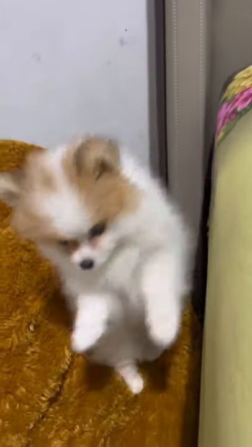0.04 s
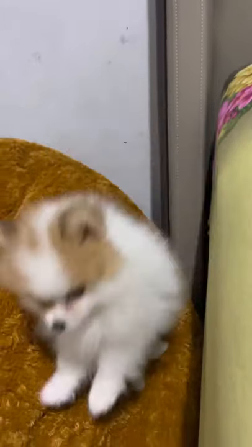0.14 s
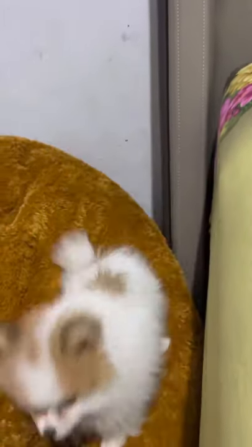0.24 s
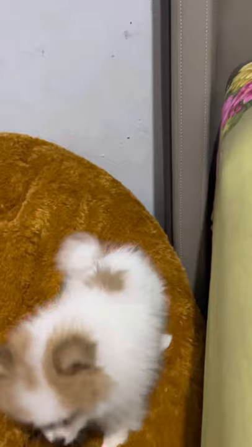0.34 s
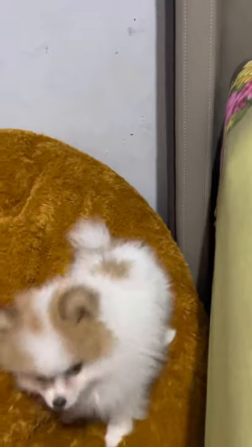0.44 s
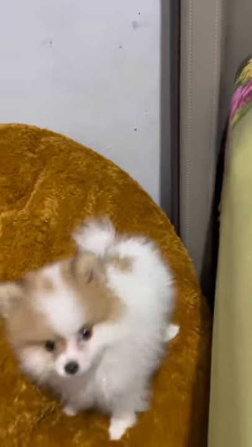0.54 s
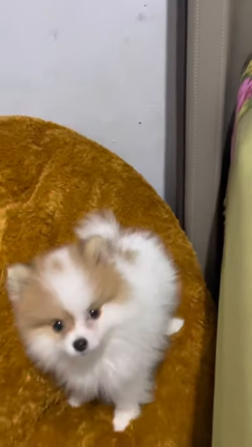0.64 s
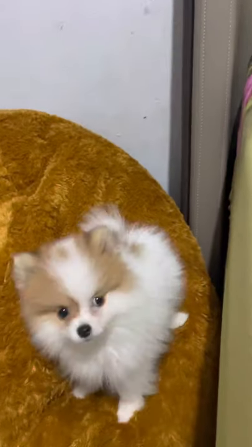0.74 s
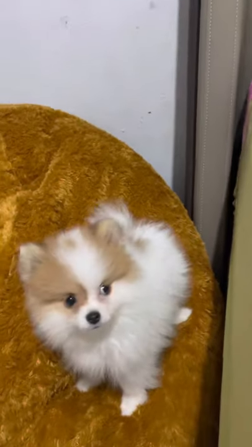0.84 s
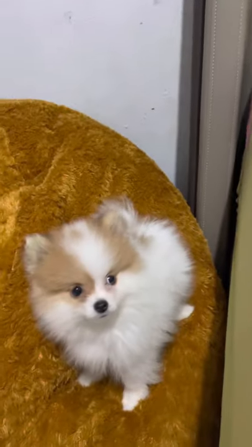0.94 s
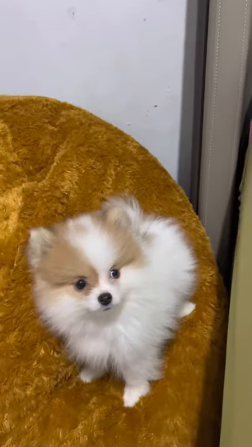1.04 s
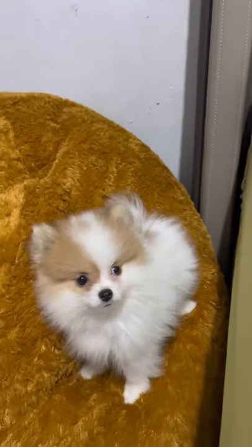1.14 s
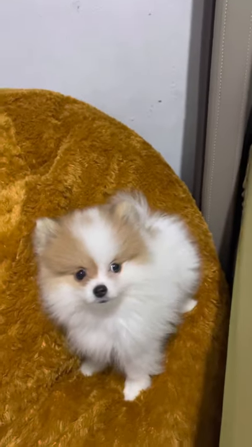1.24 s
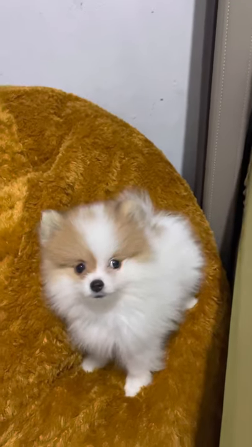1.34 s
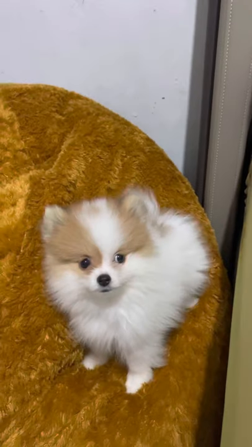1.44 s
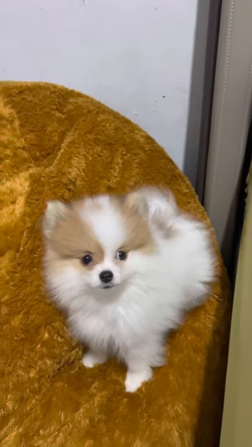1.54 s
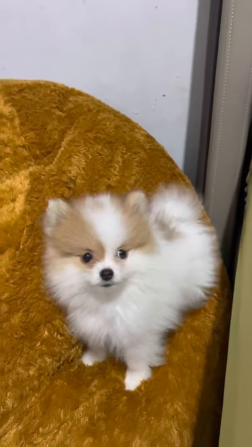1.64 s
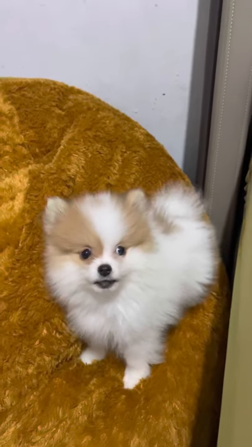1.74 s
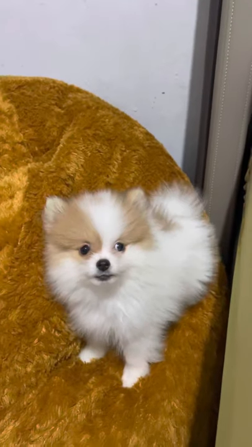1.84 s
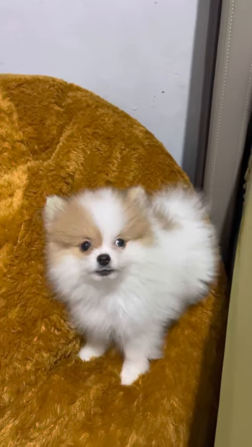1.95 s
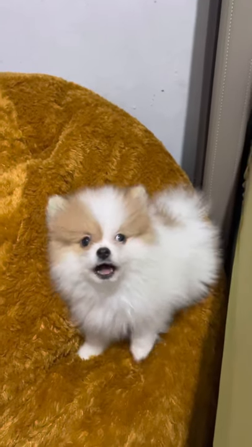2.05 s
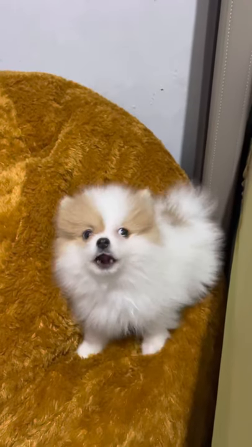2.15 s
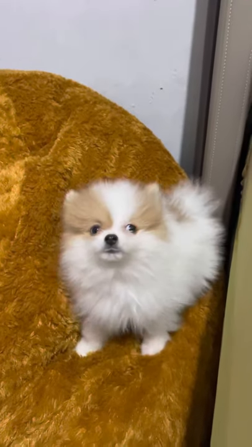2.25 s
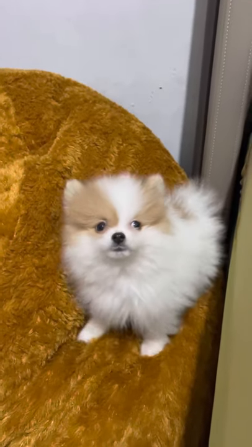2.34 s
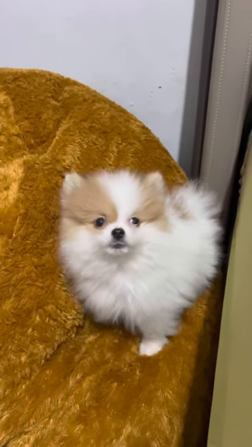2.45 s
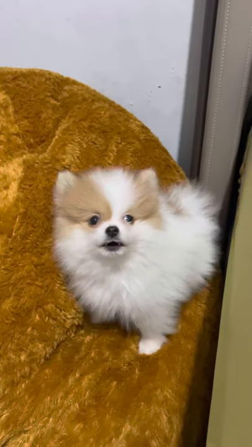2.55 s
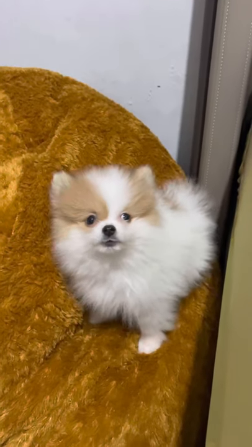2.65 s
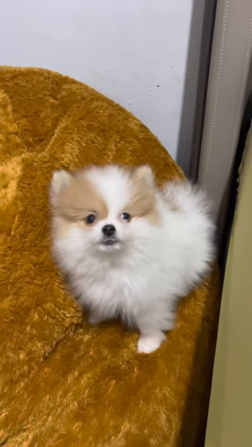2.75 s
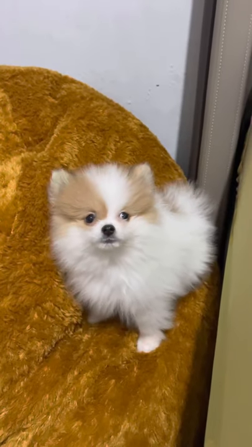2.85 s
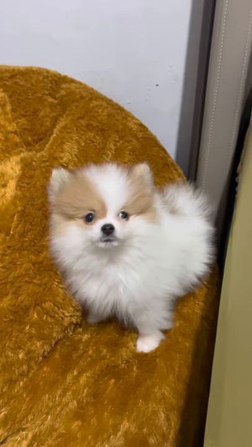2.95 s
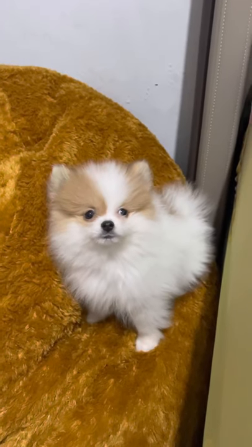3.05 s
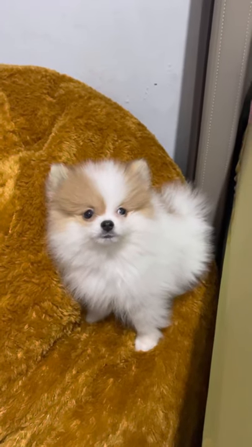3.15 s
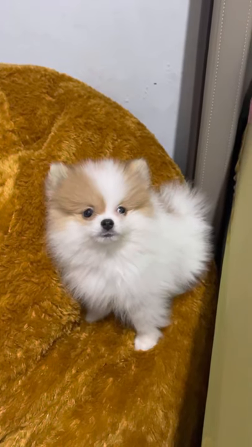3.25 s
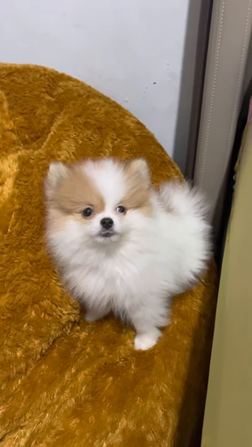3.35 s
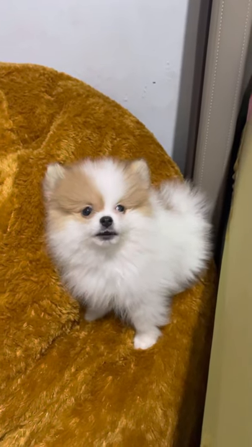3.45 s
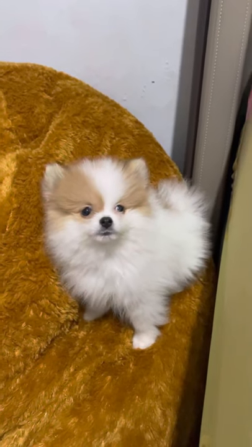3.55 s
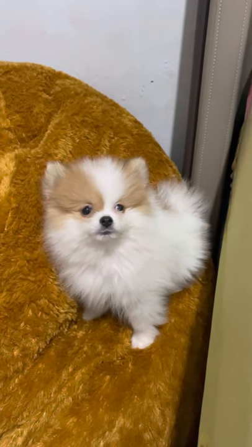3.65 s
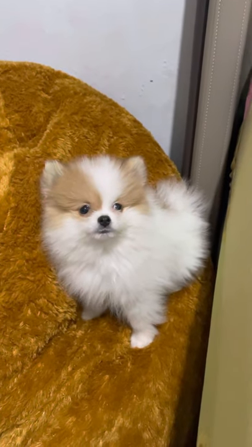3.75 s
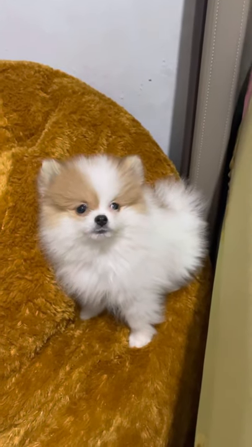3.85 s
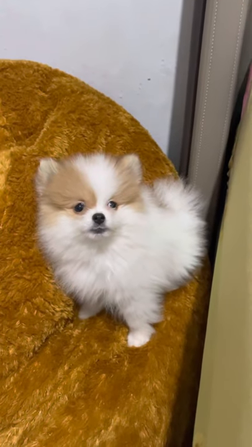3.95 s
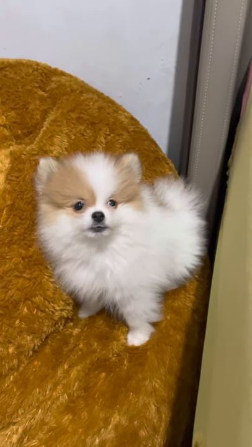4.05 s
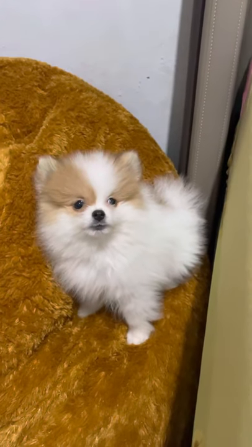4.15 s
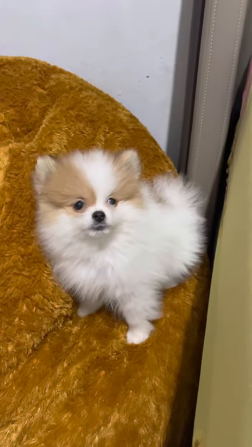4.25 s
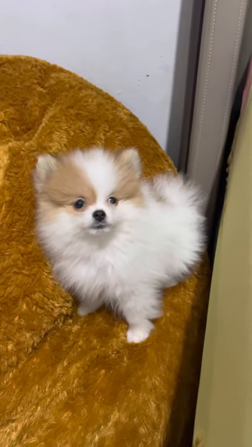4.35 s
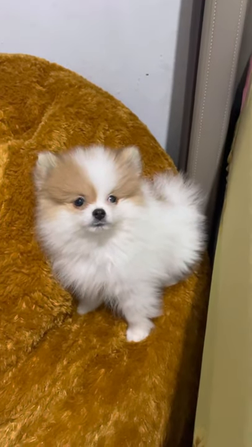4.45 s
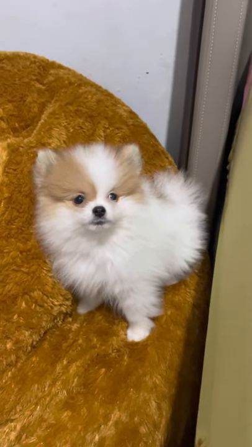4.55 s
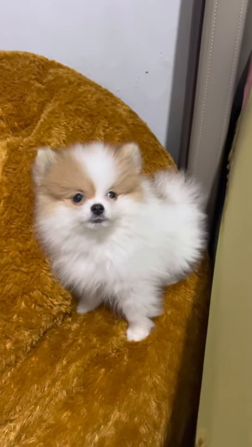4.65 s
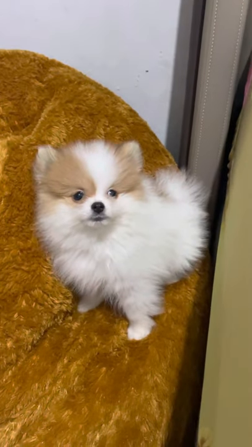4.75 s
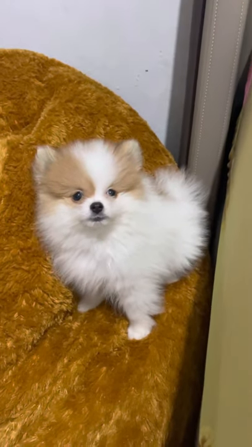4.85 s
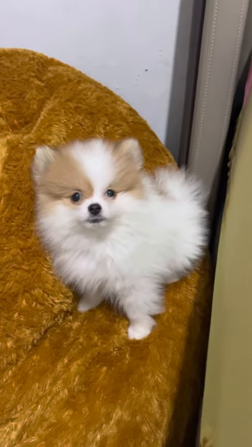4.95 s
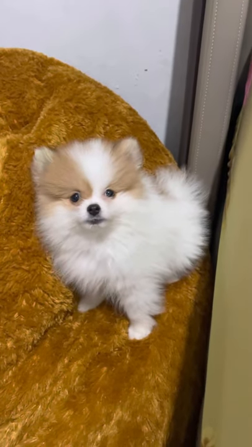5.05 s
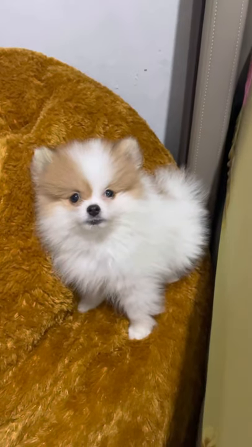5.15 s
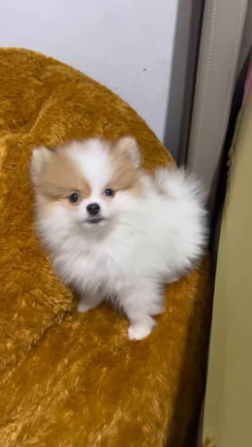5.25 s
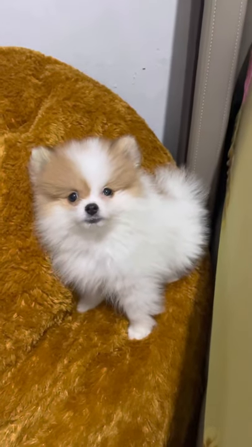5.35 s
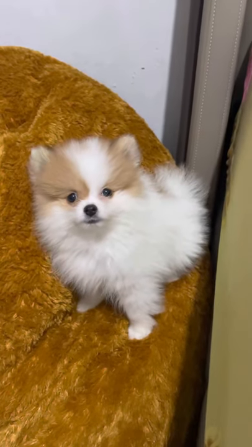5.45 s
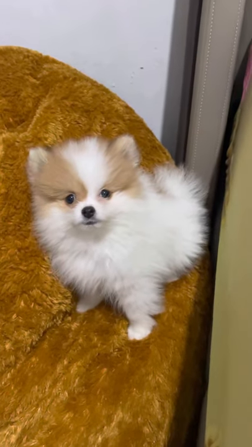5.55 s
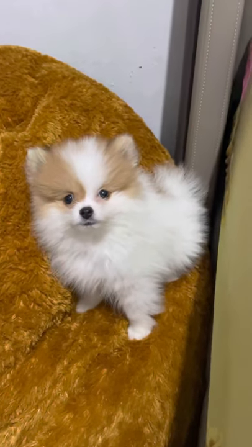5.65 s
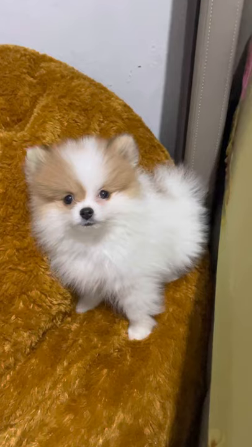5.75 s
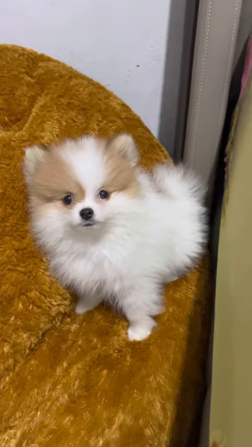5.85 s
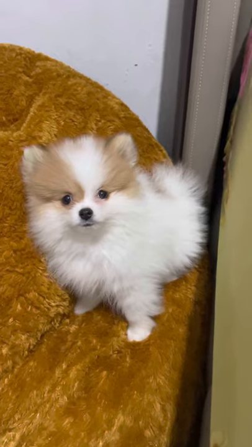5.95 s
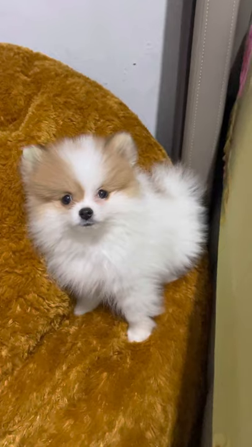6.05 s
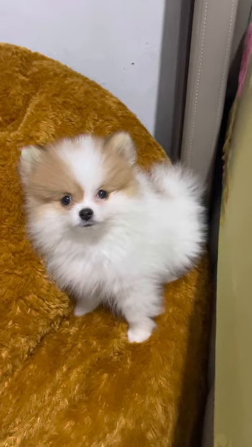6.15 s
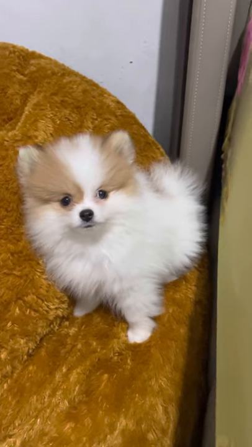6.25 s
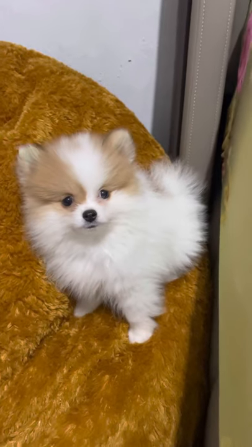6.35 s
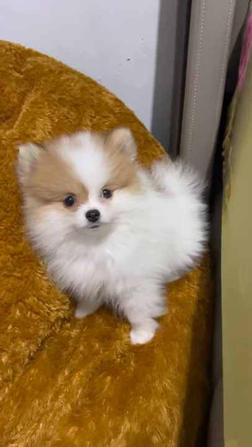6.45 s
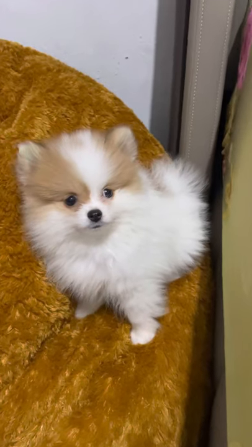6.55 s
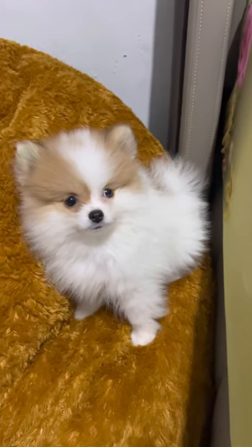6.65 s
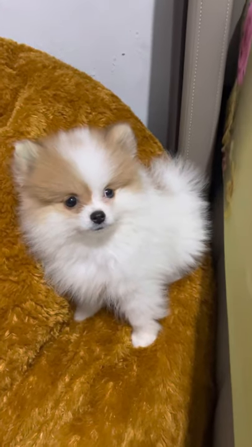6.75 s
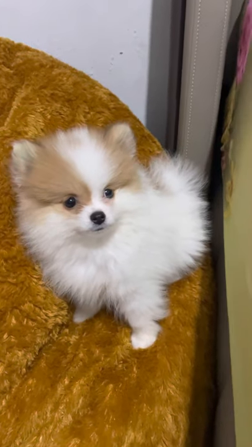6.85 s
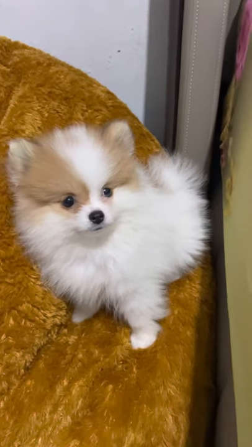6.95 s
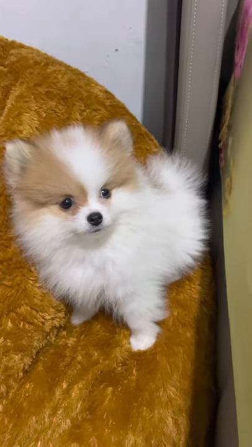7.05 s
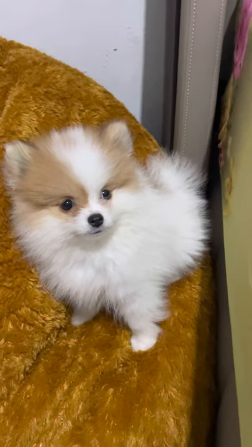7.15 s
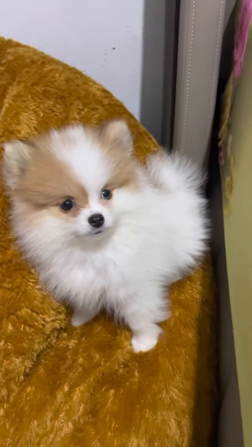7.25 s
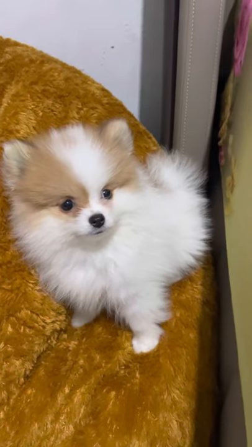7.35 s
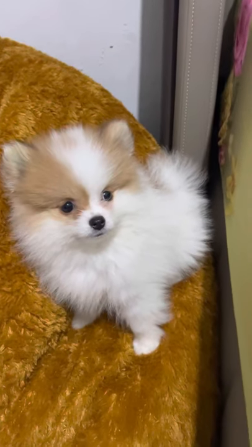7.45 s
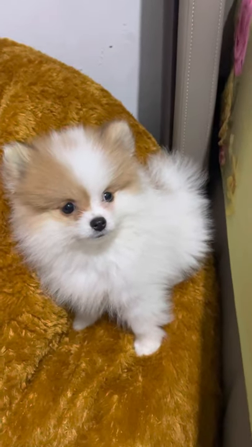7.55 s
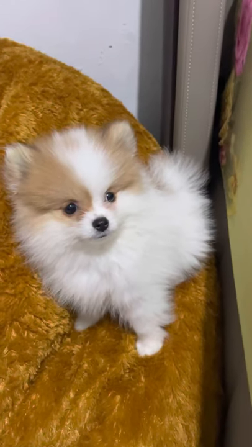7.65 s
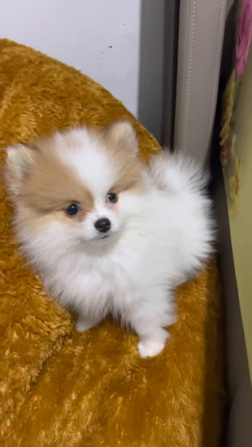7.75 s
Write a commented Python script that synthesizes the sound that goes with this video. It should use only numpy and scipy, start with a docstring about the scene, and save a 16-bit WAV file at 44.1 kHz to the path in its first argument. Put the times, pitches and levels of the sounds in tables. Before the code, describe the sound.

A puppy lands with a muffled rustle on deep fur fabric, waits, then cries out: a thin whistle-like squeak leaping into one strong yelp. Whimpers repeat roughly every half second to second, sliding downward with small raspy breaks, and shrink to tiny peeps. The stereo microphone is close, in a small room with a short light reverberation; a steady faint hum and soft air noise remain underneath.

```python
"""Indoors: a small puppy on a plush cushion drops on its paws, then yelps and whines, fading to soft cries.
Voice: summed partials that break between whistle, chest and growl registers, with noise and lip smacks.
Cushion: bursts of coloured noise. Room: a short tail of sparse random taps.
Machine: narrow-band drones and sines, stronger on the left. Behind: room tone and a faint treble swell.
A two-port microphone turns the treble phase and ducks the lows after loud sound."""
import sys
import numpy as np
from scipy import signal
from scipy.fft import rfft, irfft, next_fast_len
from scipy.io import wavfile
from scipy.ndimage import uniform_filter1d

SR = 44100
rng = np.random.default_rng(int(sys.argv[2]) if len(sys.argv) > 2 else 0)


def wrap_up_sound(samples):
    """Save the sound to the file named by the first command line argument, as 16-bit audio."""
    columns = np.atleast_2d(samples).T
    # keep every value between -1 and 1, then stretch to whole-number steps
    tamed = np.clip(columns, -1, 1)
    steps = np.round(tamed * 32767).astype(np.int16)
    wavfile.write(sys.argv[1], SR, steps)


N = 343655

# voice, one list per stretch between register breaks:
# time_s, pitch_hz, level_db, mouth_0_to_1, bright_db_per_octave, treble_lift_db
CRY_STRETCHES = [
    [(0.162, 1350, -51, 0.32, 2, 3), (0.174, 1110, -53, 0.32, -4, -7.0)],
    [(1.366, 1255, -60.5, 0.67, -4, -16), (1.374, 1127, -46, 0.7, -9, -15),
     (1.388, 1108, -65.5, 0.3, 0, -6)],
    [(1.723, 1829, -43.5, 0.86, -6, -16.5), (1.731, 1860, -26.5, 0.6, 4, 1.24),
     (1.738, 1899, -23.5, 0.6, 12.5, -12.5), (1.744, 1672, -28, 0.73, 7, 0.74),
     (1.75, 1508, -24.5, 0.66, 6, 6), (1.758, 1639, -24.5, 0.63, 8, -0.6),
     (1.768, 1805, -23.5, 0.56, 2.6, 9), (1.788, 1776, -27, 0.57, 5.3, 11),
     (1.8, 1682, -28.5, 0.61, 6.8, 9), (1.812, 1408, -27.5, 0.8, 2, -22.5), (1.817, 1308, -25, 0.8, -2, -4),
     (1.823, 1133, -32, 0.8, 2, -13.5)],
    [(2.013, 1179, -21.0, 1, -5.2, -4.0), (2.019, 1132, -16.5, 0.96, 4.5, -5.5),
     (2.027, 1162, -18, 1, -8, 3.26)],
    [(2.033, 661.8, -11.5, 0.51, 4, -2), (2.045, 677, -15, 1, -1.5, -16),
     (2.057, 707, -10.5, 0.89, 8, -22.5), (2.075, 738.5, -14, 0.87, 10.5, -22.5),
     (2.11, 762.2, -16.5, 0.84, 11.5, -27), (2.12, 755, -15.5, 0.59, 6, -9.5),
     (2.134, 809, -19, 0.6, 9.5, -17.5), (2.145, 798.3, -17, 0.55, 4.5, -8.0),
     (2.156, 768, -13.5, 0.56, 6.5, -13), (2.168, 752, -25, 0.7, -0.7, -13.4)],
    [(2.175, 1334, -16.5, 0.54, -3, 6), (2.191, 1280, -27, 0.53, -8, 1.2),
     (2.195, 1240, -37, 0.9, -4.5, -14)],
    [(2.224, 450, -42, 0.27, -9, -0.74), (2.24, 399, -38, 0.3, -1, -26),
     (2.254, 361.1, -39.5, 0.01, -8, -13), (2.28, 329.3, -38.5, 0.19, -2.5, -3),
     (2.3, 305.2, -40.5, 0, 2.7, -6), (2.33, 305.9, -39, 0.45, -11.5, 12)],
    [(2.534, 1086, -34.5, 0.57, -2.5, 1), (2.542, 1108, -33, 0.68, -1.2, -0.5),
     (2.554, 1096, -27, 0.65, 2.5, -4.5), (2.568, 1150, -28.0, 0.77, 7.5, -14.5),
     (2.582, 1162, -33, 0.69, 11, -26), (2.6, 1096, -35, 0.77, -1.2, -4),
     (2.61, 1083, -30.5, 0.58, 4, -18.5), (2.626, 1052, -30.7, 0.46, 3, -13),
     (2.666, 1110, -33.5, 0.53, -1, -9.5), (2.692, 1065, -33.5, 0.49, 2.5, -10),
     (2.775, 1031, -32, 0.41, 0, -10.5), (2.793, 945, -30.5, 0.42, -1, -16.5),
     (2.799, 842.7, -28.5, 0.39, -4, -10), (2.81, 848.4, -24.5, 0.27, -5.5, -2),
     (2.816, 800.6, -28.5, 0.27, -2.5, -11.5), (2.846, 824.5, -30.5, 0.15, 1.5, -14.5),
     (2.902, 797, -31, 0.19, -1.5, -10), (2.92, 744.5, -43.5, 0.1, -2.5, -15)],
    [(3.444, 1094, -29, 0.9, -2, -10), (3.447, 1082, -28, 0.93, -1.2, -21.5)],
    [(3.453, 547, -20.5, 0.62, -12, 16.5), (3.466, 558.3, -19, 0.5, -9.5, 25),
     (3.474, 614, -22.9, 1, -7.7, -6.5), (3.482, 670, -22, 0.54, -6.5, 13),
     (3.488, 721.3, -25, 0.19, 0.9, 0)],
    [(3.494, 1119, -21.5, 0.8, -2, 7), (3.503, 1109, -25, 0.57, -2.1, 1.5),
     (3.514, 1069, -24, 0.54, -1, -8), (3.53, 943, -23.5, 0.29, -4.5, 6),
     (3.562, 769.6, -27.5, 0.2, -6.5, 2.5), (3.578, 739, -35.5, 0.12, -6.5, 3.5)],
    [(3.584, 865.5, -40.5, 0.24, -2.5, 5), (3.596, 881, -32.5, 0.15, -9, 3.5),
     (3.608, 910.3, -43, 0.14, -4, -0.9)],
    [(3.62, 331.3, -46.5, 0.24, -3.5, 2.5), (3.654, 372.5, -38.5, 0.18, -4.5, 7.5),
     (3.674, 412.9, -37.5, 0.16, -3, -4.5), (3.698, 431, -41.5, 0.2, -5, -10.4)],
    [(3.704, 161, -39, 0.12, 0, -10), (3.728, 177, -40.5, 0.19, -2.5, -5.5),
     (3.742, 163.8, -38.5, 0.16, -1, -5), (3.78, 158.4, -43, 0.16, -1.5, -12.5),
     (3.812, 149, -45, 0.2, -3, -1.5), (3.838, 152.2, -50, 0.01, -9, 3.5)],
    [(4.118, 1118, -47.5, 0.6, -5.5, -19.4), (4.126, 1099, -36.5, 0.63, -1.5, -24.5),
     (4.138, 1020, -31, 0.46, -4, -15.5), (4.148, 1064, -32.5, 0.51, 1.6, -19),
     (4.165, 978.6, -28.0, 0.53, 1, -27), (4.181, 879, -26, 0.35, -1.5, -14),
     (4.211, 834.7, -26, 0.23, -0.6, -11.5), (4.261, 837.4, -26.5, 0.19, -4.5, 1.5),
     (4.288, 866.8, -26.5, 0.2, -2.5, -15)],
    [(4.294, 213, -31, 0.2, 0.2, -21), (4.302, 211.1, -30, 0.27, 0.6, -17.5),
     (4.362, 216.3, -36.5, 0.08, 4.5, -35), (4.374, 221, -37.5, 0.02, 3.5, -33.5),
     (4.39, 218, -39, 0.04, -1, -27.9), (4.406, 209.5, -41.6, 0.05, 0, -23.5),
     (4.42, 208, -40.5, 0.24, -3.3, -19.5), (4.472, 205, -38.5, 0.21, -6, -15.5)],
    [(4.484, 353, -40, 0, -5, -25.5), (4.494, 342, -47, 0, -14, -19)],
    [(4.764, 280.4, -47, 0.12, 1, -16), (4.782, 275, -36.5, 0.18, -6.5, -20.5)],
    [(4.788, 974.5, -40.5, 0.45, -8.1, -21.5), (4.8, 1068, -38.5, 0.53, -2.5, -25),
     (4.81, 968.3, -40, 0.35, -7, -20), (4.816, 902, -36, 0.35, -5.5, -23.5),
     (4.824, 870, -35, 0.16, -14, -18), (4.827, 883, -45.5, 0.2, -5.5, -2)],
    [(5.074, 1183, -45, 0.61, -4, -12), (5.082, 1099, -38.5, 0.6, -3.5, -19.5),
     (5.12, 1129, -37.5, 0.65, 1.8, -26), (5.146, 1049, -36.5, 0.51, -1, -18.5),
     (5.16, 971.4, -36.5, 0.44, -4, -17), (5.172, 893.5, -34.5, 0.25, -2, -10.5)],
    [(5.176, 803, -37.5, 0.12, -8, -13.5), (5.182, 768, -51, 0.12, 0, -6.5)],
    [(5.434, 1127, -51, 0.62, -5, -14.6), (5.444, 1118, -41, 0.66, -0.6, -28),
     (5.452, 1067, -40, 0.58, -3.5, -26), (5.459, 953, -44, 0.3, -7.4, -17.5)],
    [(5.468, 770, -42.5, 0.12, -6, -7), (5.474, 752, -40.5, 0.12, -5, -13.5)],
]
# throat response for whistle and chest voice: freq_hz, gain_db
THROAT_RESPONSE = [(550, -31.0), (800, -8.5), (1100, -7.5), (1500, -0.3), (2200, -8.5), (3000, -6.5),
                   (3600, -10.0), (4200, -9.5), (5100, -8.0), (6000, -2.0), (6900, -5.5), (7900, -14.5),
                   (8600, -21.5), (10500, -31), (12000, -27.5), (13500, -20), (15500, -29)]
# tract response for low moans: freq_hz, gain_db
MOAN_RESPONSE = [(150, -20.5), (250, -13.5), (400, -1.05), (650, -7.0), (830, 0.0), (1100, -12.5),
                 (1500, -6.0), (2100, -4.5), (2600, -24.5), (3200, -11.5), (4800, -14.0), (9000, -24.5)]
# flutter of the folds against a second, slower vibration: start_s, length_s, added_depth_0_to_1
RASP_MOMENTS = [(1.735, .065, .03), (1.362, .008, .25), (1.808, .01, .15), (2.024, .01, .45),
                (2.118, .028, .65), (2.3, .04, .25), (2.555, .042, .2), (2.908, .02, .45),
                (3.436, .012, .45), (3.45, .035, .04), (3.485, .007, .35), (3.655, .045, .3),
                (3.7, .1, .32), (3.8, .045, .45), (4.295, .04, .18), (4.335, .06, .3), (4.395, .1, .18),
                (4.76, .02, .16), (4.812, .007, .3)]
# air noise against the voice, one per stretch, before the treble term: ratio_db
AIR_TO_VOICE_DB = [-32, -28, -25.5, -23, -24, -26, -38.5, -33.5, -7.5, -19.5, -30, -28, -40.5, -39.5, -33,
                   -31, -32, -29.5, -27, -27.5, -26, -31, -26]
# air past the teeth: freq_hz, density_db_per_hz
BREATH_COLOUR = [(400, -65), (700, -31), (1500, -8), (2500, -7.5), (3300, -17), (3900, -26.5), (5000, -15),
                 (6700, -12.5), (7700, -28.5), (9000, -44.5), (11500, -47), (13500, -39), (15500, -45.5)]
# thin high hiss above 11 kHz that swells with the cries: freq_hz, density_db_per_hz
HIGH_HISS_COLOUR = [(9000, -40), (11500, -13.5), (12500, -2), (13700, 0), (14800, -6), (15600, -17)]
# lips parting: start_s, level_db, ring_hz
LIP_SMACKS = [(1.683, -56, 6300), (1.692, -38, 1850), (5.345, -60, 5000)]
# direct sound between channels: freq_hz, left_lead_rad
DIRECT_LEAD = [(300, 0), (500, -.8), (800, -1.6), (950, -1.3), (1150, -.7), (1700, 0), (3600, 0),
               (4200, .7), (5000, 0)]
# direct sound between channels: freq_hz, left_minus_right_db
DIRECT_LEAN = [(200, 4.5), (350, 12.5), (650, 10), (820, 9.5), (1000, 3.5), (1700, 3), (2300, 2.5),
               (3500, 2), (4300, -7.5), (5500, -1.5), (8000, 1.5)]
# fur on plush: peak_s, level_db (before a common lift), rise_db_per_s, fall_db_per_s
RUSTLE_BURSTS = [(.17, -79, 55, 100), (0.204, -52.5, 1500, 153), (.236, -47, 302, 211),
                 (.36, -65, 200, 106), (1.368, -67, 1300, 300), (1.4, -75, 600, 50), (1.51, -79, 300, 196),
                 (4.998, -77, 1800, 202), (5.344, -72.5, 1299, 429.5), (4.86, -78, 300, 298),
                 (5.468, -79.5, 601, 62), (5.515, -80, 600, 1500)]
# plush noise: freq_hz, density_db_per_hz
PLUSH_COLOUR = [(200, -7), (400, -11), (700, -11), (1200, -10), (2000, -12), (3500, -14), (6000, -17),
                (9500, -12), (11500, -16.5), (13700, -14), (14700, -21), (15700, -22.5)]
# plush noise between channels: freq_hz, likeness_-1_to_1
PLUSH_LIKENESS = [(400, .7), (700, .3), (1200, .8), (1900, .7), (2600, -.1), (4700, .1), (5700, .85),
                  (7700, .7), (9000, 1), (11000, 1), (12500, .7), (14500, 1)]
# plush noise between channels: freq_hz, left_minus_right_db
PLUSH_BALANCE = [(400, 7), (1300, 10), (1600, 4), (2500, -3), (4500, 0.5)]
# room decay: freq_hz, t60_s
ROOM_DECAY = [(400, 0.62), (1300, 0.56), (3500, 0.56), (9000, 0.63)]
# diffuse tail between channels: freq_hz, likeness_-1_to_1
ROOM_LIKENESS = [(3000, .3), (5500, .6), (8000, .8), (8700, 1), (11000, 1), (12000, .75), (14000, .9)]
# wavering low drones: centre_hz, width_hz, level_db (before left/right balance)
LOW_DRONES = [(59.4, 11, -67), (96.9, 17, -63), (113.6, 6.5, -61.5)]
# faint steady tones: freq_hz, level_db (before left/right balance)
STEADY_TONES = [(936.7, -87), (1039, -85), (1561, -86), (1663, -93.5)]
# sinking hum tones: freq_hz, level_db (before left/right balance), slope_db_per_s after HUM_SINK_START_S
HUM_TONES = [(412.3, -61.5, -1.5), (511.3, -62.5, -2)]
# room tone: freq_hz, density_db_per_hz
ROOM_TONE_COLOUR = [(30, -30.5), (46, -15.5), (100, -3.5), (141, -15.5), (220, -14), (400, -12.5),
                    (560, -17), (700, -19.5), (1100, -25), (2100, -35), (2700, -35), (3500, -43),
                    (4500, -44), (5500, -46), (6700, -51.5), (10000, -54.5), (13000, -49), (14200, -53.5),
                    (15700, -67.5)]
# background noise between channels: freq_hz, likeness_-1_to_1
BACKGROUND_LIKENESS = [(60, .8), (130, .86), (350, .65), (520, .1), (700, -.6), (1000, -.35), (1350, 0),
                       (1700, .4), (2200, -.2), (4000, 0), (5200, -.6), (6300, .1), (7000, .5), (8700, 1),
                       (11000, 1), (12000, .7), (14300, .9)]
# background noise between channels: freq_hz, left_minus_right_db
BACKGROUND_BALANCE = [(60, 0.5), (110, 4), (200, 2.5), (380, 10.5), (700, 2), (1290, 0), (2380, -0.5),
                      (4400, 0.5), (8120, -1), (15000, -2.5)]
# treble swell envelope: time_s, level_db
SWELL_LEVEL = [(5.5, -94.5), (6.3, -85.5), (6.9, -78), (7.8, -91)]
# treble swell: freq_hz, density_db_per_hz
SWELL_COLOUR = [(1500, -26.5), (2200, -5), (3500, -1), (5000, -5.5), (7000, -26)]
# treble phase between microphone ports: freq_hz, left_lead_rad
MIC_PORT_LEAD = [(5000, 0), (5700, .5), (6700, 1.3), (7700, 2.1), (8600, np.pi), (11000, np.pi),
                 (12700, 4.6), (14300, 2 * np.pi)]

BAND_LIMIT_HZ = 15800
CALM_DEPTH, FLUTTER_MAX_HZ = .04, 260  # flutter between rasps; it runs at half the pitch up to the limit
MOUTH_SHUT_HZ, MOUTH_OPEN_HZ, MOUTH_Q = 600, 3840, 5  # resonance climbs as the mouth opens
TREBLE_HZ, FLICKER_DB = 2600, 3.5  # partials above flicker
ATTACK_S, BLEND_S = .008, .006  # start from silence; register break
NASAL_HZ, NASAL_OCTAVES, NASAL_DB = 3470, 0.4, -9.5  # soft cries pass the nose, which swallows a band
SOFT_DB, LOUD_DB = -32, -20  # fully nasal cry, fully open cry
LEAD_NOISE_DB = -19.5  # faint noise rises just before each cry
AIR_DB_PER_TREBLE_DB = .4  # cries rich in treble are airier
HIGH_HISS_DB, HIGH_HISS_OPEN_DB, HIGH_HISS_POWER = -65.5, 25, .6  # base, gain at full mouth, loudness exponent
ROOM_DB, ROOM_TONE_DB, HUM_SINK_START_S = -15.5, -59, 4.6


def puppy():
    """Fold vibration sets the cries; noise follows their loudness; parting lips click."""
    t = np.arange(N) / SR
    time_s, pitch_hz, _, mouth, bright_db, treble_db = np.vstack(CRY_STRETCHES).T
    pitch_hz = np.interp(t, time_s, pitch_hz)
    shine_db = np.interp(t, time_s, treble_db + 2 * bright_db)
    mouth = np.interp(t, time_s, mouth)
    depth = rasp_depth(t)
    voice = cries(pitch_hz, depth)
    loudness = noise_envelope(voice)
    ratio_db = np.repeat(AIR_TO_VOICE_DB, [len(rows) for rows in CRY_STRETCHES])
    airy_db = np.interp(t, time_s, ratio_db) + AIR_DB_PER_TREBLE_DB * shine_db
    breath = amp(airy_db) * (1 + 6 * depth) * loudness * mono_hiss(BREATH_COLOUR, patchy_db=0)
    return voice + breath + high_hiss(loudness, mouth) + lips()


def rasp_depth(t):
    """Flutter depth: a calm floor plus smoothed rough moments."""
    rasping = sum(depth * (abs(t - start - length / 2) < length / 2) for start, length, depth in RASP_MOMENTS)
    return CALM_DEPTH + uniform_filter1d(rasping, size=350)


def cries(pitch_hz, depth):
    """Joins the stretches, carrying the fold cycle across each register break."""
    shake = depth * fuzz(np.minimum(pitch_hz / 2, FLUTTER_MAX_HZ), 90, N)
    flutter = shake / np.sqrt(1 + depth ** 2)
    waver = .002 * fuzz(0, 90, N) + .03 * depth * fuzz(0, 400, N)  # pitch unsteadier with flutter
    voice, cycles = np.zeros((2, N))
    for rows in CRY_STRETCHES:
        at, turns, sound = cry(rows, flutter, waver, cycles)
        voice[at] += sound
        cycles[at] = turns
    return voice


def cry(rows, flutter, waver, cycles):
    """One stretch: fold partials through throat and mouth, shaken by flutter."""
    time_s, *columns = np.transpose(rows)
    first, last = round(time_s[0] * SR), round(time_s[-1] * SR)
    fade = round(BLEND_S * SR)
    rise = fade if cycles[first - fade] else round(ATTACK_S * SR)
    at = np.arange(first - rise, last + fade)
    hz, level_db, mouth, bright_db, treble_db = (np.interp(at / SR, time_s, c) for c in columns)
    hz = uniform_filter1d(hz, fade, mode="nearest")  # the folds cannot turn corners
    turns = cycles[at[0]] + np.cumsum(hz * (1 + waver[at])) / SR

    k = np.arange(1, int(BAND_LIMIT_HZ / max(hz.min(), 500)))[:, None]
    partial_hz = k * hz
    tract = THROAT_RESPONSE if hz.max() > 500 else MOAN_RESPONSE
    gain_db = read(tract, partial_hz) + bright_db * np.log2(np.minimum(partial_hz, 7500))
    gain_db += treble_db / (1 + (TREBLE_HZ / partial_hz) ** 6)
    nasal = np.clip((LOUD_DB - level_db) / (LOUD_DB - SOFT_DB), 0, 1)
    gain_db += nasal * NASAL_DB * np.exp(-(np.log2(partial_hz / NASAL_HZ) / NASAL_OCTAVES) ** 2)
    flicker = evened(uniform_filter1d(rng.standard_normal((len(k), len(at))), size=500, axis=1))
    gain_db += FLICKER_DB * flicker * np.clip(partial_hz / TREBLE_HZ - 1, 0, 1)

    u = partial_hz / (MOUTH_SHUT_HZ * (MOUTH_OPEN_HZ / MOUTH_SHUT_HZ) ** mouth)
    resonance = np.maximum(u, 1) / np.hypot(1 - u ** 2, u / MOUTH_Q)
    heights = amp(gain_db) * resonance
    heights *= (partial_hz < BAND_LIMIT_HZ) / np.linalg.norm(heights, axis=0)  # level_db sets loudness
    partials = heights * np.sin(2 * np.pi * k * turns + k * k)  # k * k scatters the phases
    tone = np.sqrt(2) * amp(level_db) * partials.sum(0)
    edge = np.clip(np.minimum((at - at[0]) / rise, (at[-1] - at) / fade), 0, 1)
    return at, turns, tone * (1 + flutter[at]) * np.sin(edge * np.pi / 2) ** 2


def noise_envelope(voice):
    """Loudness of the cries, trailing a little, plus a faint rise just before each cry."""
    trailing = np.sqrt(lag(voice ** 2, 250))
    leading = np.sqrt(lag(voice[::-1] ** 2, 300)[::-1])
    return trailing + amp(LEAD_NOISE_DB) * leading


def high_hiss(loudness, mouth):
    """Thin hiss above 11 kHz: grows slower than the voice, and with mouth opening."""
    level = amp(HIGH_HISS_DB + HIGH_HISS_OPEN_DB * mouth) * loudness ** HIGH_HISS_POWER
    return level * mono_hiss(HIGH_HISS_COLOUR, patchy_db=2)


def lips():
    """Parting lips: damped sine clicks."""
    clicks = np.zeros(N)
    u = np.arange(200) / SR
    for start_s, level_db, hz in LIP_SMACKS:
        start = round(start_s * SR)
        clicks[start:start + 200] += amp(level_db) * np.exp(-u / .0005) * np.sin(2 * np.pi * hz * u)
    return clicks


def cushion():
    """Paws and fur brush the plush: noise bursts with straight dB slopes."""
    t = np.arange(N) / SR
    level = sum(amp(db - np.where(t < peak_s, rise * (peak_s - t), fall * (t - peak_s)))
                for peak_s, db, rise, fall in RUSTLE_BURSTS)
    lift = amp(3.5 + 0.51 * fuzz(0, 73, N))  # common lift, trembling
    return level * lift * hiss(PLUSH_COLOUR, PLUSH_LIKENESS, PLUSH_BALANCE, patchy_db=1.5)


def room(x):
    """Room tail: sparse taps of random sign, each band dying at its own speed."""
    taps = np.zeros((2, SR))
    at = np.arange(300, SR - 20, 20) + rng.integers(0, 20, (2, (SR - 301) // 20))
    np.put_along_axis(taps, at, rng.choice([-1., 1.], at.shape), axis=1)
    hz, t, (left, other) = signal.stft(taps, SR, nperseg=256)
    like = read(ROOM_LIKENESS, hz)[:, None]
    pair = np.array([left, like * left + np.sqrt(1 - like ** 2) * other])
    decay = amp(-60 * t / read(ROOM_DECAY, hz)[:, None])
    tail = signal.istft(pair * decay, SR, nperseg=256)[1]
    return signal.fftconvolve(x[None], tail / np.linalg.norm(tail[0]), axes=1)[:, :N]


def machine():
    """Machine: narrow-band drones, steady sines and sinking hums, stronger on the left."""
    t = np.arange(N) / SR
    drones = sum(amp(db) * fuzz(hz, width, N) for hz, width, db in LOW_DRONES)
    tones = sum(amp(db) * np.sin(2 * np.pi * (hz * t + rng.random())) for hz, db in STEADY_TONES)
    for hz, db, slope_db in HUM_TONES:
        level_db = db + slope_db * np.maximum(t - HUM_SINK_START_S, 0) + 0.4 * fuzz(0, 2, N)
        tones = tones + amp(level_db) * np.sin(2 * np.pi * hz * t)
    return drones * amp([[1.2], [-1.2]]) + np.sqrt(2) * tones * amp([[3.], [-5.]])


def room_tone():
    """Room tone: continuous coloured noise."""
    noise = hiss(ROOM_TONE_COLOUR, BACKGROUND_LIKENESS, BACKGROUND_BALANCE, patchy_db=.7)
    return amp(ROOM_TONE_DB) * noise


def treble_swell():
    """Faint treble noise that swells and sinks."""
    level_db = np.interp(np.arange(N) / SR, *np.transpose(SWELL_LEVEL))
    return amp(level_db) * hiss(SWELL_COLOUR, BACKGROUND_LIKENESS, BACKGROUND_BALANCE, patchy_db=3.5)


def ports(x, lead, lean):
    """Phase lead and balance between the channels, by frequency."""
    size = next_fast_len(N + 2048)
    hz = np.fft.rfftfreq(size, 1 / SR)
    left = amp(read(lean, hz) / 2) * np.exp(.5j * read(lead, hz))
    return irfft(rfft(x, size) * np.array([left, 1 / left]), size)[:, :N]


def hiss(colour, likeness, lean, patchy_db):
    """Two-channel noise shaped in the spectrogram, with drifting patches; unit rms."""
    frames, hz = N // 256 + 5, np.fft.rfftfreq(1024, 1 / SR)
    a, b, c, d, patches = rng.standard_normal((frames, 513, 5)).T
    patches = evened(uniform_filter1d(uniform_filter1d(patches, size=14, axis=0), size=12, axis=1))
    like = read(likeness, hz)[:, None]
    tilt = amp(read(lean, hz) / 2)[:, None]
    left = a + 1j * b
    right = like * left + np.sqrt(1 - like ** 2) * (c + 1j * d)
    pair = np.array([tilt * left, right / tilt])
    pair *= amp(read(colour, hz)[:, None] + patchy_db * patches) / np.sqrt(tilt ** 2 + tilt ** -2)
    return evened(signal.istft(pair, nperseg=1024, noverlap=768)[1][:, :N])


def mono_hiss(colour, patchy_db):
    """One channel of shaped noise."""
    return hiss(colour, [(1, 1)], [(1, 0)], patchy_db)[0]


def fuzz(hz, width_hz, size):
    """Narrow-band noise around the curve hz, unit rms."""
    r = np.exp(-np.pi * width_hz / SR)
    white = rng.standard_normal((size, 2)) @ [1, 1j]
    slow = signal.lfilter([1], [1, -2 * r, r * r], white)
    carrier = np.exp(2j * np.pi * np.cumsum(hz * np.ones(size)) / SR)
    return evened((slow * carrier).real)


def lag(x, samples):
    """One-pole smoothing."""
    return signal.lfilter([1 / samples], [1, 1 / samples - 1], x)


def read(points, hz):
    """Reads a spectrum table, linear on a log-frequency axis."""
    f, value = np.transpose(points)
    return np.interp(np.log(hz + 1), np.log(f + 1), value)


def evened(x):
    """Scales to unit rms."""
    return x / np.sqrt(np.mean(x ** 2) + 1e-20)


def amp(db):
    """Decibels to gain."""
    return 10 ** (np.asarray(db) / 20)


def scene():
    """Puppy direct and through the room, cushion, machine, background."""
    dog = puppy()
    direct = ports(dog, DIRECT_LEAD, DIRECT_LEAN)
    return direct + amp(ROOM_DB) * room(dog) + cushion() + machine() + room_tone() + treble_swell()


def record(dry):
    """Port phase, bass roll-off, low-band gain control after loud sound, band limit."""
    heard = ports(dry, MIC_PORT_LEAD, [(1, 0.0026)])
    heard = signal.sosfilt(signal.butter(4, 42, "high", fs=SR, output="sos"), heard)
    power_db = 10 * np.log10(abs(uniform_filter1d((heard ** 2).mean(0), 2000)) + 1e-12)
    fall_db = np.arange(N) * 70. / SR  # peak hold recovers at 70 dB/s
    held_db = np.maximum.accumulate(power_db + fall_db) - fall_db
    over_db = np.maximum(held_db + 27, 0)  # threshold -27 dB
    low = signal.sosfiltfilt(signal.butter(4, 560, fs=SR, output="sos"), heard)
    ducked = heard - low * (1 - amp(-.8 * lag(over_db, 4000)))
    band_limit = signal.firwin(511, BAND_LIMIT_HZ, window=("kaiser", 9), fs=SR)
    return signal.oaconvolve(ducked, band_limit[None], "same")


dry = scene()
out = record(dry)
wrap_up_sound(out)
```